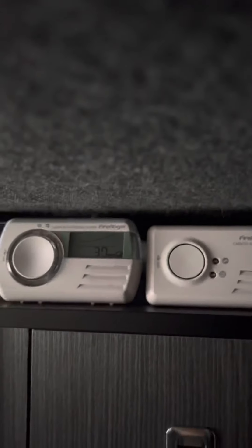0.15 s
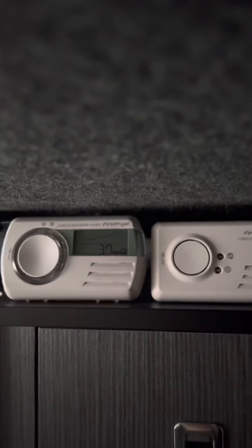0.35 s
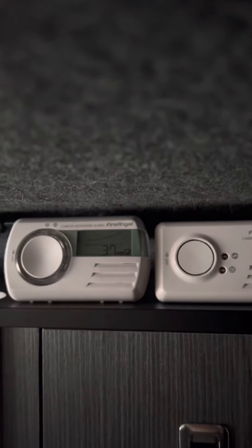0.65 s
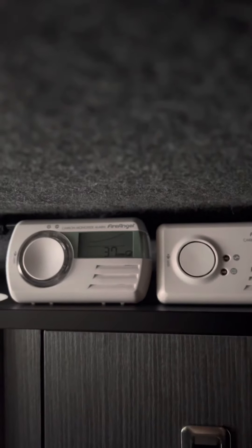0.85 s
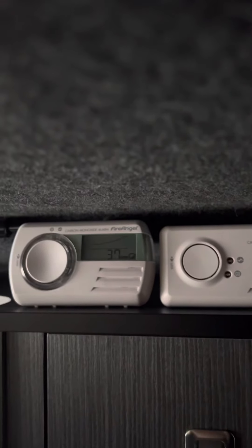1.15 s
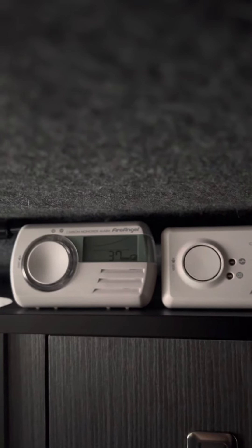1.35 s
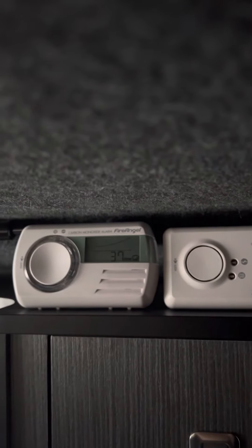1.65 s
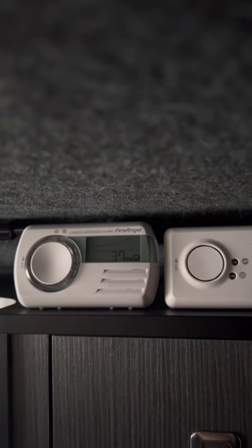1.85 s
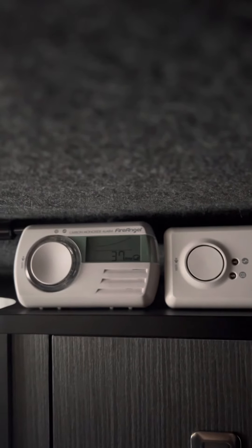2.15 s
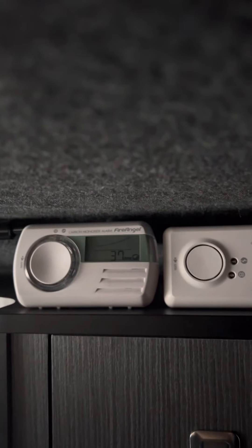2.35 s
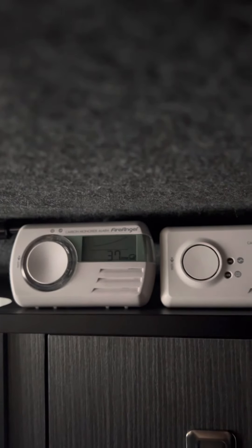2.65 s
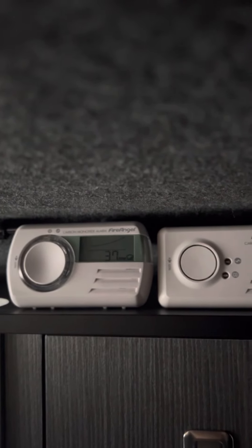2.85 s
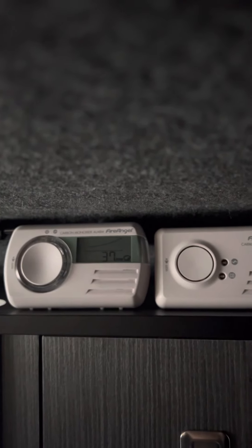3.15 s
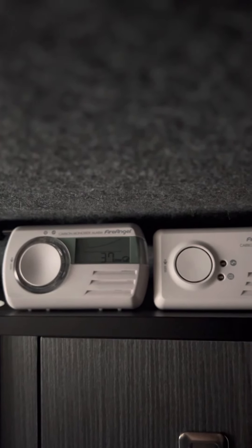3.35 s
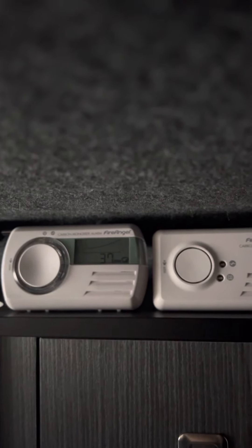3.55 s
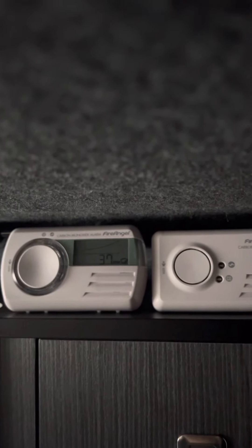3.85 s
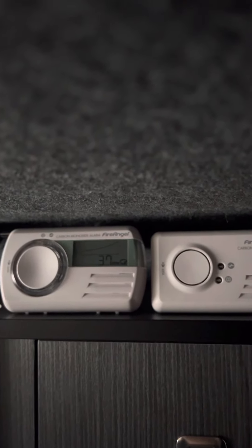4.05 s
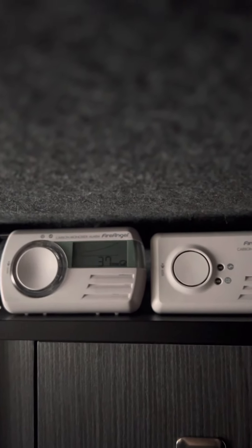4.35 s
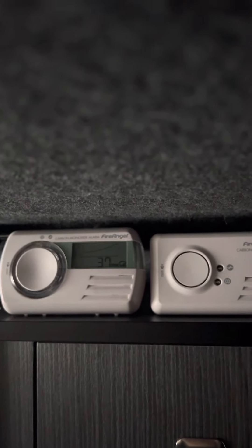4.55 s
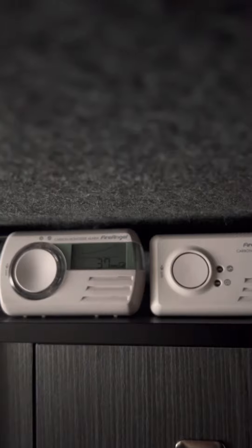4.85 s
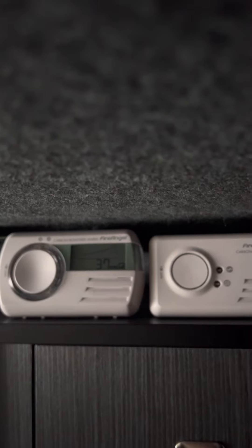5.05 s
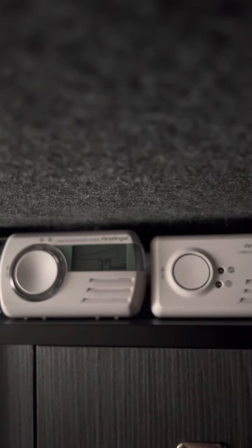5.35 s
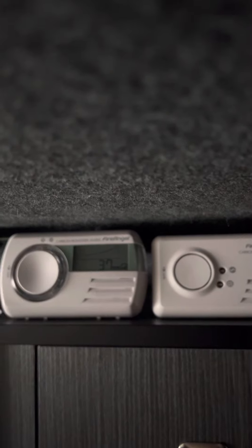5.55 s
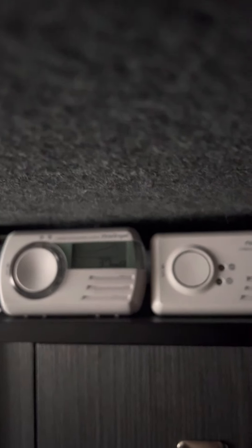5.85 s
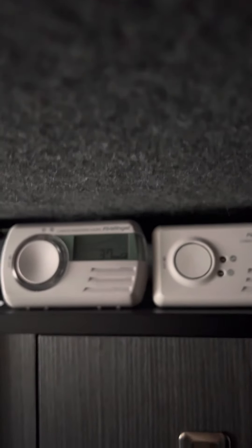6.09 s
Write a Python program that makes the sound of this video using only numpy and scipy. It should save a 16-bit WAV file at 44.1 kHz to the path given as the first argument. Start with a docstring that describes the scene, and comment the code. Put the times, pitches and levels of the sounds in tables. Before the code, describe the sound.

A small air heater hums steadily inside a cramped camper van, its burner flame fluttering in a low murmur, with one soft wooden knock.

```python
"""A low hum with a fluttering flame: a diesel air heater runs steadily in a small camper van, by a cupboard.
Shaft imbalance hums and the seven fan blades whine: sines at multiples of the shaft rate.
The flame murmurs as resonant noise, sings on wavering pitches in surges and shakes the cabin's low modes.
Air is shaped noise, ringing a duct and hissing at the vent.
One soft panel knock is a sum of decaying sines; four dry ticks are noise bursts."""
import sys
import numpy as np
from scipy import signal
from scipy.fft import rfft, irfft, next_fast_len
from scipy.io import wavfile
from scipy.ndimage import uniform_filter1d, map_coordinates

SR = 44100
rng = np.random.default_rng(int(sys.argv[2]) if len(sys.argv) > 2 else 0)


def bounce(signal):
    """Save signal as a 16-bit WAV file at the path given by the first command-line argument."""
    frames = np.transpose(np.atleast_2d(signal))
    limited = np.clip(frames, -1, 1)
    pcm = np.round(limited * 32767).astype(np.int16)
    wavfile.write(sys.argv[1], SR, pcm)


N = 274285

# blower speed: t/s, rate/(turns per s)
SHAFT_SPEED = [(0, 71.59), (0.7, 71.58), (1.3, 71.7), (4.4, 71.7), (5.0, 71.81), (6.22, 71.84)]
# blower tones: multiple of shaft rate, rms level/dB, side re centre/dB, side phase/rad
BLOWER_TONES = [(1, -41, -48.5, -3), (4, -67.5, -14, 1), (7, -45.5, -14.5, 3.5), (8, -79, -2.5, 3),
                (13, -81.5, -3, -1.1), (14, -84.5, 1, -1), (35, -83.5, 3, 0.5), (37, -88.5, 0.5, -2.5)]
HUM_WAVER_DB, WAVERS_PER_S = 0.35, 5

# resonances, levels relative within a table: f/Hz, width/Hz, centre/dB, side/dB, side phase/rad
BOOM_MODES = [(109, 32, 3.5, -39, -7)]  # flame's deep boom
PIPE_MODES = [(224.4, 41, -2, -36, 1.8), (238, 56, -1.5, -33.5, 1.7), (257.3, 23, -5.5, -34.5, 1.8)]  # burner pipe
CABIN_MODES = [(148, 15, -1.5, -22, -4.5), (169, 46, 1.5, -22.5, 3.5), (272, 29, -6, -17.5, 0.5)]  # cabin's low modes
DUCT_MODES = [(322.5, 64.0, -4, -52.0, 1.7), (389, 142.0, -5.5, -16.5, 1.5), (466, 91, -3.0, -14.5, 3),
              (562, 75.0, -10, -16.0, 1), (711.5, 48, -8.5, -24, 2), (771.3, 35.0, -10.5, -8, 0.9),
              (1023.0, 119.0, -26, -24.5, 0.7), (1116, 82.0, -17.5, -31.0, 1.6),
              (1302, 90.0, -14, -29.5, -2), (1334.5, 49.0, -13, -33.5, 2), (1429, 75.0, -15.0, -35.5, 1.5),
              (1499.0, 35.0, -21.5, -20.0, 0.1), (1596, 58.0, -15.0, -20.5, -3.0),
              (1672, 70.0, -11.5, -16, -3.0), (1722, 45.0, -10.5, -23, -2), (1836, 110, -20, -52.0, -2.5),
              (1964, 96.0, -25, -39, -2), (2027, 65, -22.5, -27.5, 4.5), (2090, 57.0, -25, -35.0, -1.8),
              (2197.0, 64, -25.5, -33.5, 2.1), (2227, 107.0, -27.5, -40.0, 1.6),
              (2335.0, 35.0, -22.5, -52.0, 1.6), (2394, 157.0, -30, -33, 0.5),
              (2513, 70, -24.5, -17.5, 1.7), (2650, 97, -28.5, -33.5, 2.5), (2769, 90.0, -21.0, -53, 0.5),
              (2980, 130, -28.0, -16, 1.7), (3058.0, 86.0, -23.5, -51.5, 3),
              (3219, 81.0, -27.5, -52.5, -2.5), (3383.0, 150, -33.5, -38.0, 1.5),
              (3510, 65.0, -39.0, -27, 2.2), (3820, 130, -35.5, -35.0, 2.3), (3980, 134.0, -36.5, -42.0, 3),
              (4180, 73.0, -31.5, -36.5, 1), (4340, 160.0, -42, -37.0, 2), (4500, 166.0, -38.5, -42, -1.5)]  # air duct

# flame's deep boom surging: crest t/s, length/s, level/dB, nominal f/Hz
BOOM_SURGES = [(.024, 0.033, -44, 100.3), (.148, .03, -47.5, 105.5), (0.748, .022, -44.5, 115.6),
               (0.81, 0.038, -44.5, 107.4), (1.205, .028, -45.5, 105.7), (1.289, .02, -44, 109),
               (1.348, .024, -37.5, 106.5), (1.409, 0.018, -43.5, 108.5), (1.467, 0.03, -41, 106.3),
               (1.583, 0.038, -42, 109), (1.768, .06, -42.5, 110.4), (2.262, .04, -45, 108.4),
               (2.363, 0.045, -43.5, 106.6), (2.521, .02, -45.5, 110), (2.614, .03, -42.5, 103),
               (2.757, .03, -44.5, 107), (2.924, 0.021, -45, 104.8), (3.158, 0.021, -45.5, 105.9),
               (3.258, .022, -44.5, 105.2), (3.365, .028, -40, 109), (3.642, 0.024, -45, 110),
               (3.964, 0.034, -41.5, 103.6), (4.031, .022, -46.5, 111), (4.264, .028, -47.5, 108),
               (4.336, .035, -47, 110.6), (4.57, 0.046, -45, 113.2), (4.847, .036, -44.5, 109),
               (5.074, 0.039, -42, 106.7), (5.166, 0.037, -44.5, 105.4), (5.343, .03, -42.5, 108),
               (5.519, .02, -46, 104.1), (5.574, 0.04, -42.5, 108), (5.777, 0.039, -45.5, 103.7),
               (5.85, 0.021, -42, 109), (5.935, .028, -41, 103.8), (6.075, 0.034, -39.5, 109),
               (6.187, 0.02, -48, 103)]
# flares fluttering in the burner pipe: crest t/s, length/s, level/dB, nominal f/Hz
PIPE_FLARES = [(0.222, .022, -39.5, 249), (0.357, .02, -39, 252.6), (.403, 0.015, -40.5, 246.7),
               (0.512, 0.029, -39, 255), (0.629, 0.02, -39.5, 237), (0.948, 0.041, -41, 250.6),
               (1.053, .03, -39.5, 249.5), (1.106, 0.026, -42.5, 243.2), (1.193, 0.023, -39.5, 248.8),
               (1.322, 0.02, -43.5, 236.4), (1.76, 0.045, -40, 238), (1.85, 0.023, -40.5, 236),
               (2.042, 0.05, -41.5, 258), (2.118, 0.018, -43, 250), (2.242, 0.017, -38, 242),
               (2.33, 0.038, -40.5, 249), (2.39, 0.019, -42.5, 228), (2.444, 0.012, -38, 241.7),
               (2.522, 0.025, -39, 257.6), (2.765, .02, -42.5, 240), (2.83, .024, -42.5, 248),
               (3.059, .04, -42, 257.8), (3.236, .034, -43.5, 225), (3.349, 0.036, -41.5, 246.6),
               (3.452, 0.02, -42, 232), (3.642, .022, -44.5, 232.5), (3.824, .018, -40.5, 247),
               (3.88, 0.024, -38, 239), (3.994, 0.029, -40, 247.4), (4.043, .02, -41.5, 252),
               (4.098, 0.018, -41, 241), (4.16, .024, -38.5, 231), (4.224, 0.015, -38.5, 249.3),
               (4.279, 0.038, -41.5, 258), (4.427, 0.038, -41.5, 243), (4.506, 0.038, -42, 241.2),
               (4.85, 0.015, -42, 244), (5.309, .022, -42.5, 240.5), (5.417, .024, -42, 247),
               (5.547, 0.025, -41.5, 230), (5.804, .026, -40, 251.7), (5.859, 0.023, -40.5, 233)]
# cabin droning louder: crest t/s, length/s, level/dB
CABIN_SWELLS = [(1.41, 0.041, -48), (1.545, .028, -47), (2.535, .015, -48.5), (3.12, .03, -51),
                (3.48, .025, -51), (5.1, .09, -54), (5.82, 0.044, -50.5)]
# flutter noise between flares: t/s, level/dB
FLUTTER_REST = [(0, -47), (4.5, -46.5), (4.7, -50.5), (5.2, -49.5), (5.5, -47), (6.22, -48)]
BOOM_REST_DB = -50  # boom noise between surges
SURGE_RISE_SHARE = 0.55  # part of a surge spent swelling
RING_ON_S = 0.014  # added to each length: resonances build up and let go slowly
LOCKING = 1.2  # how strongly a surge quiets the flame's noise
# steady rumble spectrum: f/Hz, relative density/dB per Hz
RUMBLE_SPECTRUM = [(10, -30), (25, -21), (40, -7), (60, 2.5), (85, -2.5), (130, -4.5), (200, -1.5),
                   (300, -8.5), (600, -38), (1200, -80)]

# gain of duct and rush together: t/s, gain/dB
AIR_FLOW = [(0, -57), (1.2, -57), (2.4, -57), (3.5, -56.5), (4.6, -57), (5.6, -56.5), (5.9, -57.5),
            (6.22, -58)]
# broad rush between duct resonances: f/Hz, relative density/dB per Hz
RUSH_SPECTRUM = [(50, -31.5), (130, -6), (400, 2.5), (600, -1.5), (900, -6), (2000, -24.5), (3600, -24),
                 (5000, -45.5), (8000, -79.5)]
# bands that cabin reflections cancel midway between the microphones: f/Hz, half-width/Hz, depth/dB
CENTRE_NOTCHES = [(404, 14, -6), (717, 20, -14), (1541, 20, -8), (1901, 12, -9), (2008, 13, -9),
                  (2155, 12, -7), (2234, 10, -9), (2306, 10, -7), (2568, 24, -6), (2860, 19, -6),
                  (3751, 37, -7)]
# vent hiss, centre and side: f/Hz, relative density/dB per Hz
HISS_CENTRE = [(2500, -27.5), (4000, -6), (5000, 1), (6200, 1), (7000, -6), (9000, -14.5), (9600, -13),
               (10200, -19), (11500, -17.5), (13000, -30.5), (14500, -38.5)]
HISS_SIDE = [(2500, -26.5), (4000, -2.5), (4900, 6), (6000, -8.5), (7000, -29), (9500, -20), (12800, -7),
             (15000, -24)]
# vent hiss at rest: t/s, level/dB
HISS_LEVEL = [(0, -80), (.25, -81.5), (.4, -82), (.6, -83), (1.3, -83), (2.1, -82.5), (3.2, -83),
              (4.8, -82.5), (5.4, -82.5), (5.55, -82.5), (5.9, -85), (6.22, -83)]
# brief hiss swells: crest t/s, length/s, level/dB
HISS_SWELLS = [(.24, .07, -86), (4.43, .015, -81), (4.79, 0.046, -84), (4.99, .025, -83),
               (5.19, 0.0153, -84), (5.73, 0.053, -79.5)]
HISS_WAVER_DB = 0.5
# cabin wall echoes: earliest delay/s, latest delay/s
WALL_DELAYS_S = (.002, 0.011)
WALL_ECHO_DB = -16.5  # each echo

# knocks: t/s, level/dB
KNOCKS = [(1.501, -33)]
# cupboard panel's ring: f/Hz, relative level/dB, t60/s
PANEL_MODES = [(232.3, 4, 0.083), (320, -2, 0.06), (396, -16, 0.023)]
# ticks: t/s, peak level/dB, t60/s
TICKS = [(.045, -69, .03), (2.612, -77.5, 0.021), (2.884, -80, 0.124), (3.364, -65, 0.011)]
TOP_HZ = 14800


def blower(whine_waver_db, jitter_rad):
    """Shaft imbalance hums; the blade tone and higher orders waver in the turbulent air."""
    shaft_angle = 2 * np.pi * np.cumsum(curve(SHAFT_SPEED)) / SR
    out = np.zeros((2, N))
    for order, db, side_db, side_phase in BLOWER_TONES:
        waver_db = HUM_WAVER_DB if order == 1 else whine_waver_db
        phase = order * (shaft_angle + jitter_rad * wobble(10)) + rng.uniform(0, 2 * np.pi)
        peak = np.sqrt(2) * amp(db + waver_db * wobble(WAVERS_PER_S))
        centre = np.sin(phase)
        side = amp(side_db) * np.sin(phase + side_phase)
        out += peak * np.array([centre, side])
    return out


def flame(boom_waver_db, flutter_waver_db, cabin_db, cabin_surge_db, rumble_db):
    """Uneven combustion murmurs and sings in two resonances; its boom shakes the cabin over a rumble."""
    boom_rest_db = BOOM_REST_DB + boom_waver_db * wobble(8)
    boom = murmur(BOOM_MODES, BOOM_SURGES, boom_rest_db, span_s=0.22)
    flutter_rest_db = curve(FLUTTER_REST) + flutter_waver_db * wobble(12)
    flutter = murmur(PIPE_MODES, PIPE_FLARES, flutter_rest_db, span_s=0.05)
    boom_song = singing(BOOM_SURGES, waver_hz=2.9, sag_hz=1.226)
    flare_song = singing(PIPE_FLARES, waver_hz=3.58, sag_hz=5)
    shaking = amp(cabin_surge_db) * bells(BOOM_SURGES)
    cabin_gain = np.hypot(surging(CABIN_SWELLS, cabin_db), shaking)
    cabin = cabin_gain * resonating(CABIN_MODES)
    # centre only
    rumble = filtered(rng.standard_normal(N),
                      lambda hz: np.outer([1, 0], amp(along(RUMBLE_SPECTRUM, hz))))
    return boom + flutter + boom_song + flare_song + cabin + amp(rumble_db) * unit(rumble)


def murmur(modes, surges, rest_db, span_s):
    """The flame's noise in a resonance; it gives way while a surge sings there."""
    rest = amp(rest_db)
    gain = rest / np.sqrt(1 + LOCKING * bells(surges) / rest)
    return gain * evened(resonating(modes), span_s)


def singing(surges, waver_hz, sag_hz):
    """In each surge the flame locks onto a wavering pitch that sags off the crest; centre only."""
    gain = bells(surges)
    crest = amp(curve([(s, db) for s, _, db, _ in surges]))
    nominal_hz = curve([(s, hz) for s, _, _, hz in surges])
    pitch_hz = nominal_hz + waver_hz * wobble(25) - sag_hz * (1 - gain / crest)
    phase = 2 * np.pi * np.cumsum(pitch_hz) / SR + rng.uniform(0, 2 * np.pi)
    return np.array([np.sqrt(2) * gain * np.sin(phase), np.zeros(N)])


def air(duct_db, rush_db, eddy_db):
    """Warm air rings the duct and rushes through it in eddies, then hisses past the vent's slats."""
    rush = unit(filtered(rng.standard_normal((2, N)), lambda hz: amp(along(RUSH_SPECTRUM, hz))))
    duct = notched(amp(duct_db) * resonating(DUCT_MODES) + amp(rush_db) * rush)
    duct_gain = amp(curve(AIR_FLOW) + eddy_db * wobble(50))
    hiss = filtered(rng.standard_normal((2, N)),
                    lambda hz: amp([along(HISS_CENTRE, hz), along(HISS_SIDE, hz)]))
    hiss_gain = surging(HISS_SWELLS, curve(HISS_LEVEL) + HISS_WAVER_DB * wobble(12))
    return duct_gain * duct + hiss_gain * unit(off_walls(hiss, count=4))


def notched(pair):
    """Reflections in the cabin cancel narrow bands in the centre."""
    def response(hz):
        dip_db = sum(db * np.exp(-((hz - f) / width) ** 2) for f, width, db in CENTRE_NOTCHES)
        return amp(np.outer([1, 0], dip_db))
    return filtered(pair, response)


def off_walls(pair, count):
    """A few close walls echo the sound and ripple its spectrum."""
    delays_s = rng.uniform(*WALL_DELAYS_S, (count, 2, 1))
    return filtered(pair, lambda hz: 1 + amp(WALL_ECHO_DB) * np.exp(-2j * np.pi * hz * delays_s).sum(0))


def knocks(attack_s):
    """A dull knock rings a wooden panel's modes; tiny dry ticks are decaying low-passed noise."""
    out = np.zeros(N + SR)
    t = np.arange(SR // 4) / SR
    ring = sum(amp(db - 60 * t / t60) * np.sin(2 * np.pi * hz * t) for hz, db, t60 in PANEL_MODES)
    for s, db in KNOCKS:
        out[round(s * SR):][:len(t)] += amp(db) * ring * (1 - np.exp(-t / attack_s))
    b, a = signal.butter(2, 8500, fs=SR)
    for s, db, t60 in TICKS:
        burst = rng.standard_normal(len(t)) * amp(-60 * t / t60)
        tick = signal.lfilter(b, a, burst)
        out[round(s * SR):][:len(t)] += amp(db) * tick / np.abs(tick).max()
    return out[:N]


def resonating(modes):
    """Turbulence in resonances, as (centre, side); standing waves reach two microphones out of phase."""
    def response(hz):
        grid = np.geomspace(10, SR / 2, num=4096)
        f, width, db, side_db, phase = np.transpose(modes)[:, :, None]
        shape = 1 / (1 + (2 * (grid - f) / width) ** 2)
        centre_power = (amp(db) * shape) ** 2
        side_power = (amp(side_db) * shape) ** 2
        # power-weighted side phase
        turn = np.exp(1j * np.angle((side_power * np.exp(1j * phase)).sum(0)))
        centre = np.sqrt(centre_power.sum(0))
        side = np.sqrt(side_power.sum(0)) * turn
        return np.array([np.interp(hz, grid, gain) for gain in (centre, side)])
    return unit(filtered(rng.standard_normal(N), response))


def evened(pair, span_s):
    """Noise with its swells slower than span_s levelled out."""
    size = max(int(span_s * SR), 1)
    power = uniform_filter1d(uniform_filter1d(pair[0] ** 2, size), size)
    return pair / np.sqrt(np.abs(power) + 1e-9)


def surging(rows, rest_db):
    """A gain resting at rest_db, rising in one smooth bell per (s, length, dB) row."""
    return np.sqrt(amp(rest_db) ** 2 + bells(rows) ** 2)


def bells(rows):
    """A gain that swells and dies away once per (s, length, dB) row."""
    t = np.arange(N) / SR
    power = np.zeros(N)
    for s, length, db, *_ in rows:
        width = (length + RING_ON_S) * np.where(t < s, SURGE_RISE_SHARE, 1 - SURGE_RISE_SHARE)
        power += amp(db) ** 2 * np.exp(-((t - s) / width) ** 2)
    return np.sqrt(power)


def amp(db):
    """Decibels to gain."""
    return 10 ** (np.asarray(db) / 20)


def along(points, hz):
    """(Hz, value) points read on a log axis."""
    f, v = np.transpose(points)
    return np.interp(np.log(hz + 1), np.log(f + 1), v)


def curve(rows):
    """(s, value) rows as one value per sample."""
    return np.interp(np.arange(N) / SR, *np.transpose(rows))


def wobble(rate):
    """A smooth random curve, rate knots a second."""
    knots = rng.standard_normal(int(N * rate / SR) + 4)
    return map_coordinates(knots, [np.arange(N) * rate / SR])


def filtered(x, response):
    """x times a response of frequency."""
    m = next_fast_len(N + 8192)
    return irfft(rfft(x, m) * response(np.fft.rfftfreq(m, 1 / SR)), m)[..., :N]


def unit(pair):
    """A (centre, side) pair scaled to a centre rms of 1."""
    return pair / np.sqrt(np.mean(pair[0] ** 2))


def scene():
    """The heater's centre and side spread to left and right; knocks and ticks alike in both."""
    heater = blower(whine_waver_db=0.2, jitter_rad=0.0041)
    heater += flame(boom_waver_db=0.5, flutter_waver_db=2.04,
                    cabin_db=-56.0, cabin_surge_db=-14.5, rumble_db=-56.5)
    heater += air(duct_db=7.5, rush_db=-7.0, eddy_db=0.46)
    centre, side = heater
    return np.array([centre + side, centre - side]) + knocks(attack_s=0.002)


def record(dry):
    """Short fades avoid clicks at both ends; nothing is kept above the band limit."""
    fade = signal.windows.tukey(N, 0.002)
    return filtered(dry * fade, lambda hz: hz < TOP_HZ)


dry = scene()
out = record(dry)
bounce(out)
```